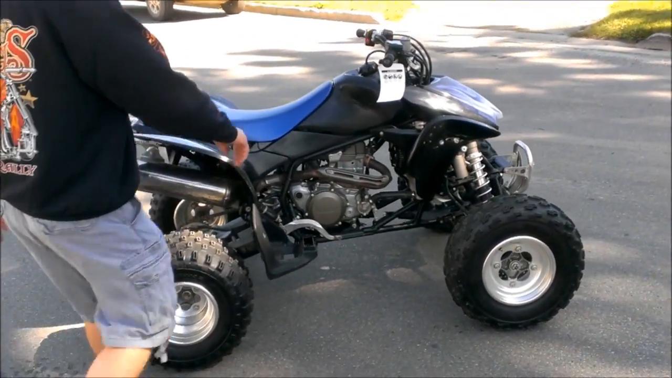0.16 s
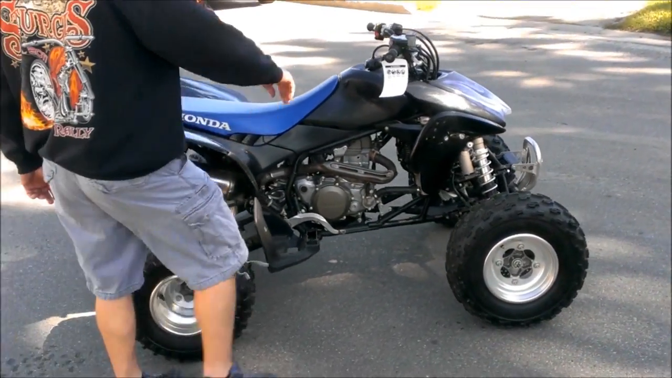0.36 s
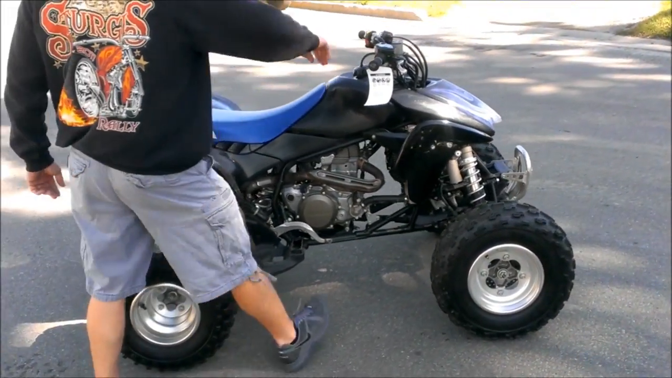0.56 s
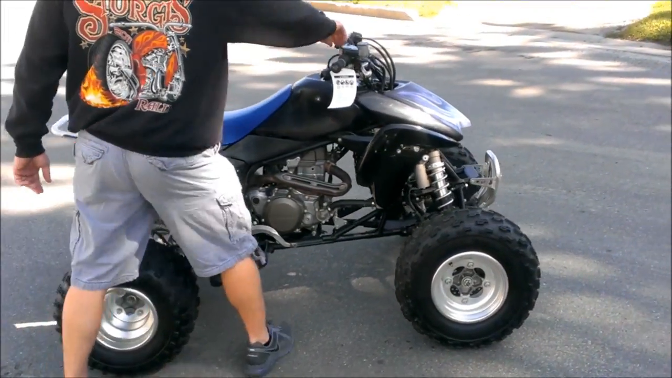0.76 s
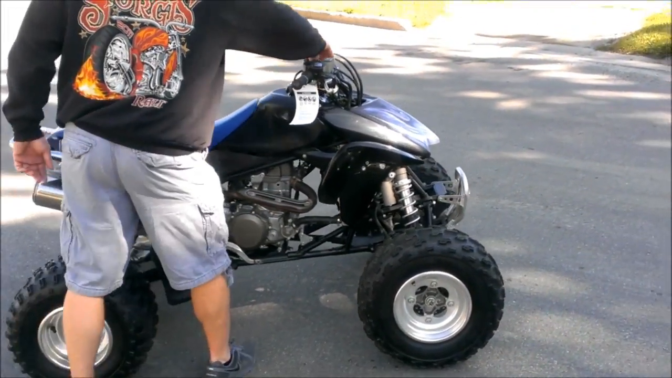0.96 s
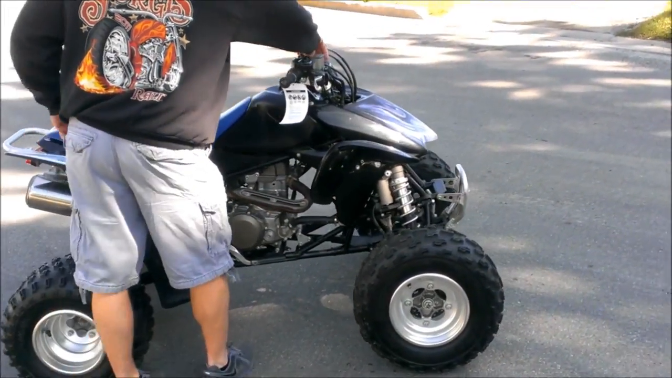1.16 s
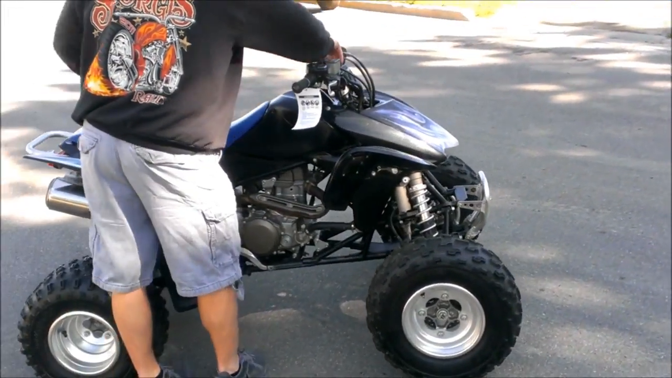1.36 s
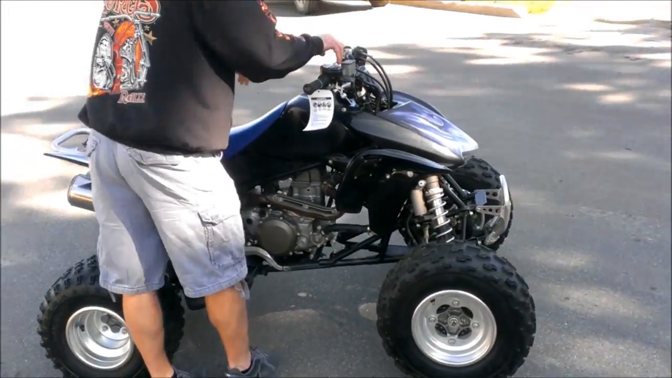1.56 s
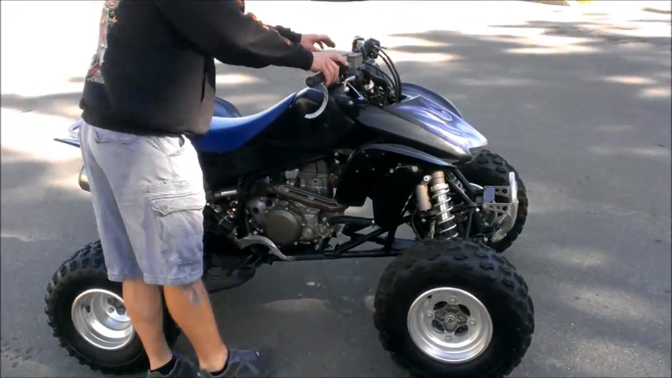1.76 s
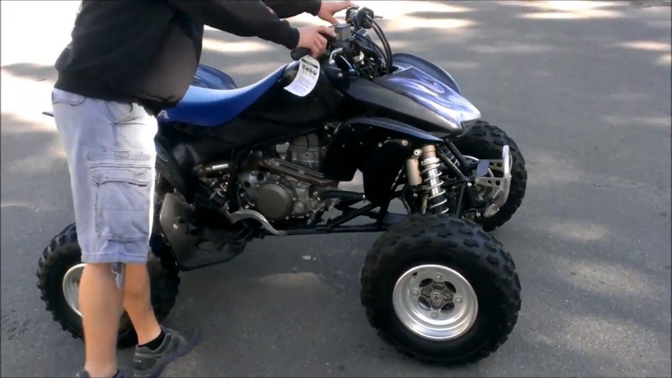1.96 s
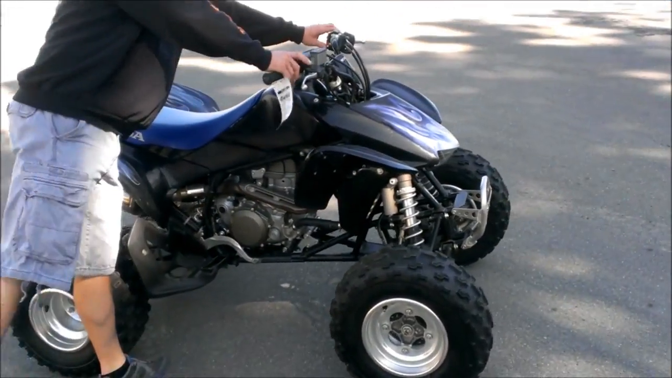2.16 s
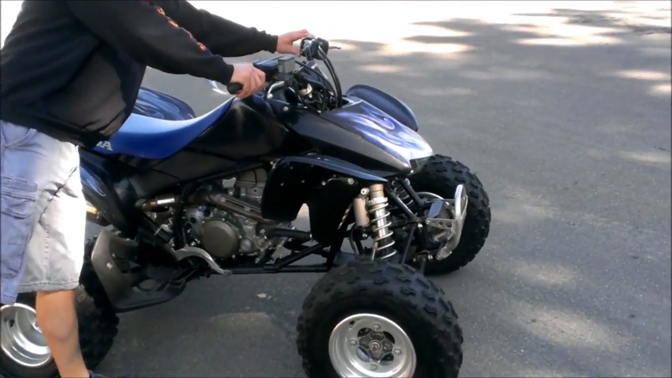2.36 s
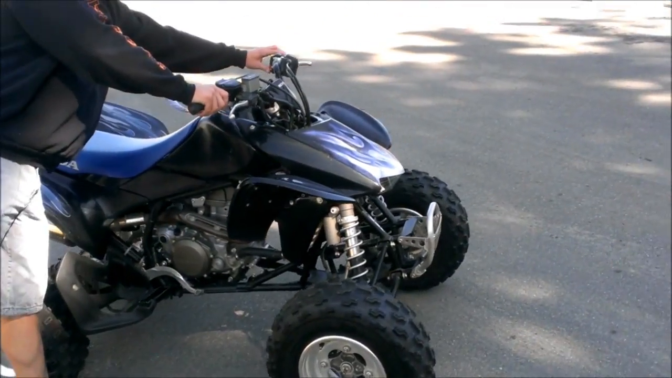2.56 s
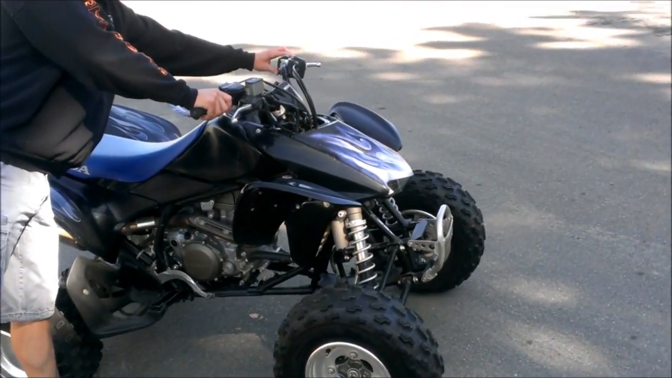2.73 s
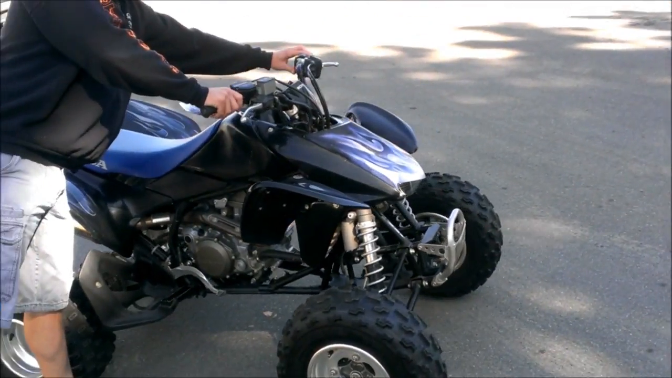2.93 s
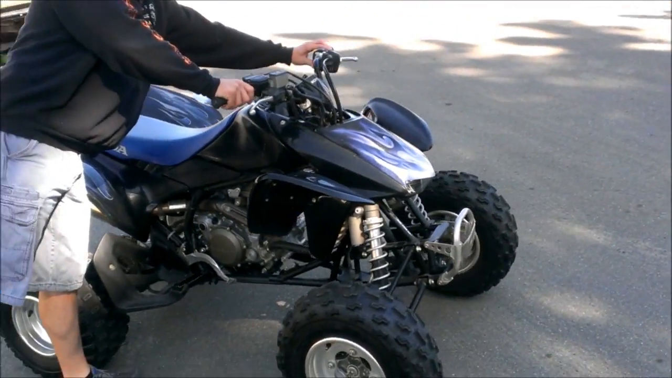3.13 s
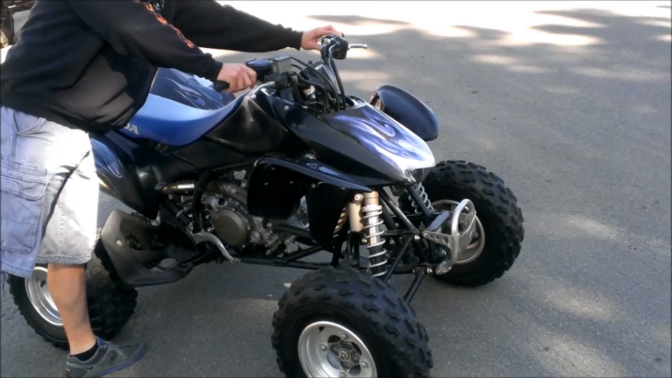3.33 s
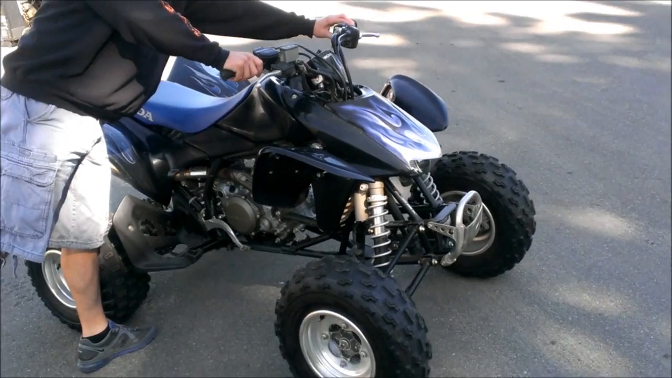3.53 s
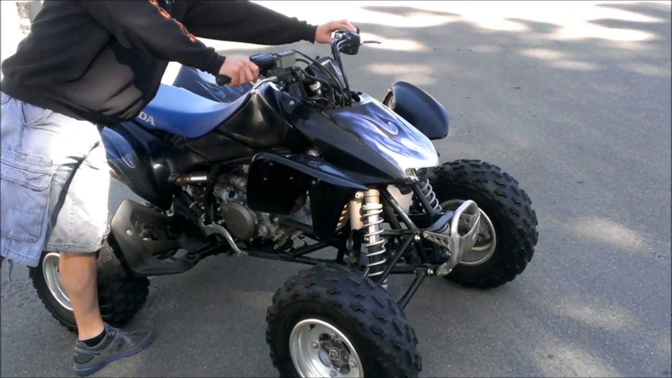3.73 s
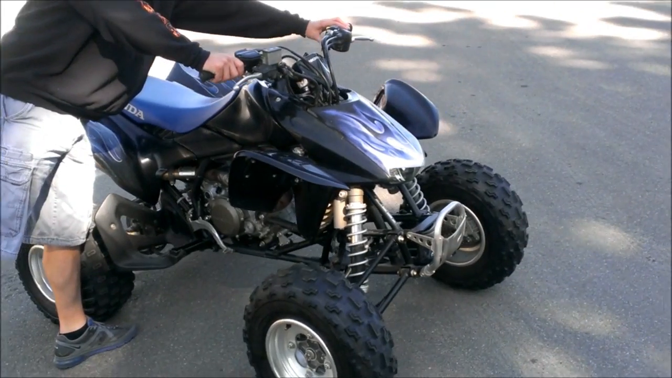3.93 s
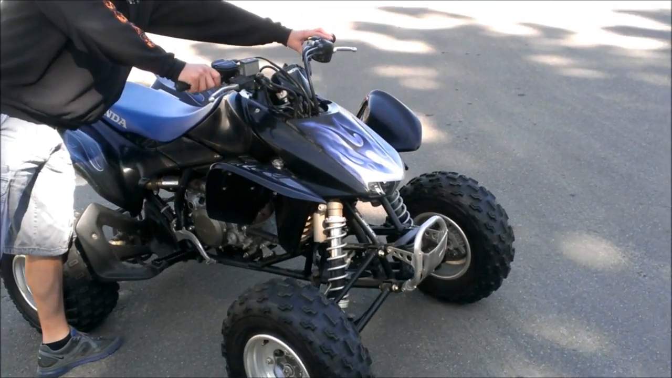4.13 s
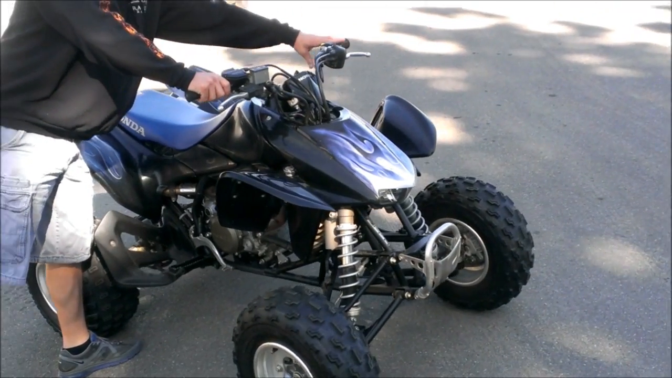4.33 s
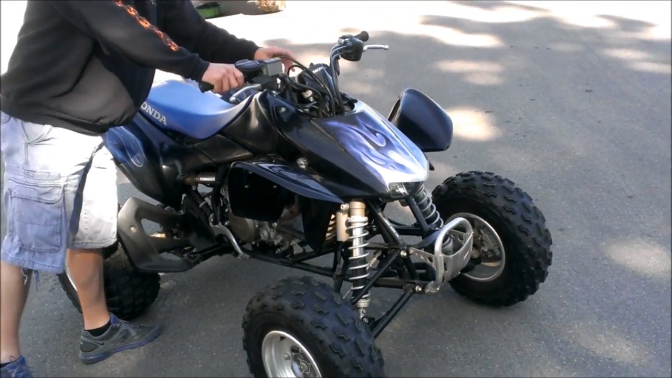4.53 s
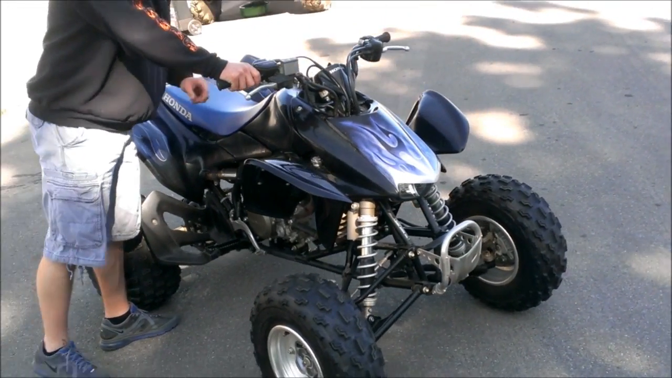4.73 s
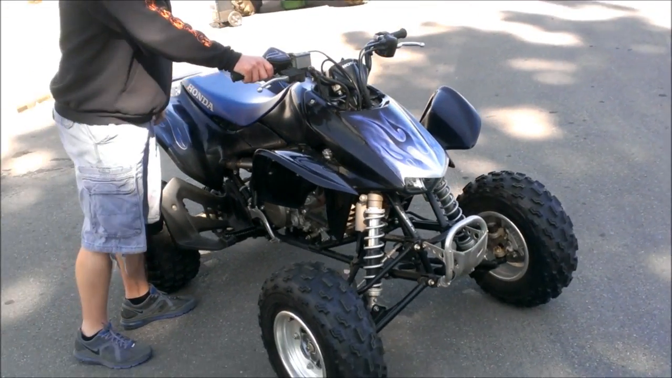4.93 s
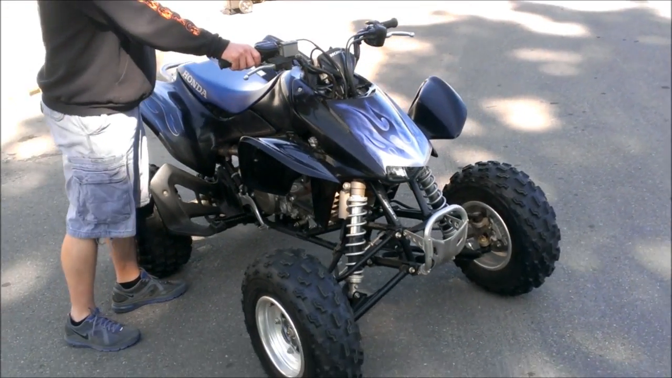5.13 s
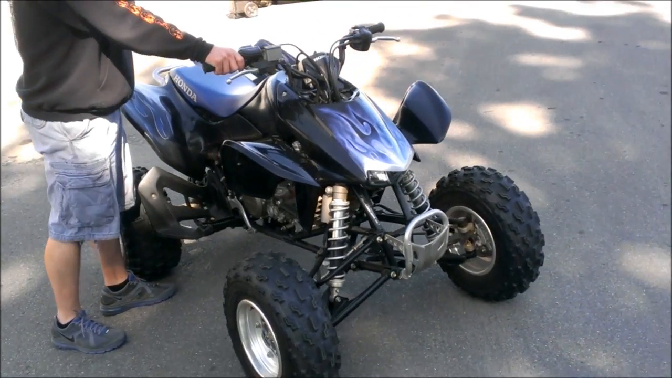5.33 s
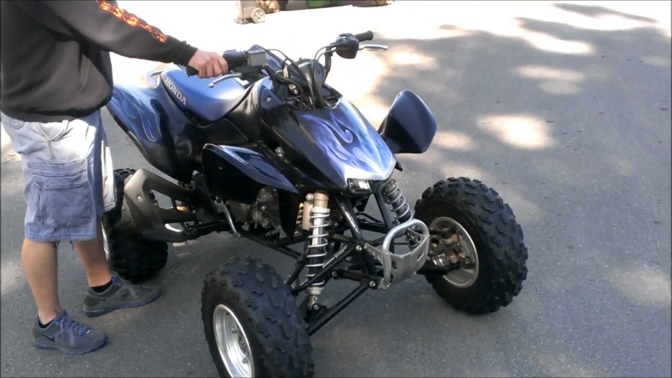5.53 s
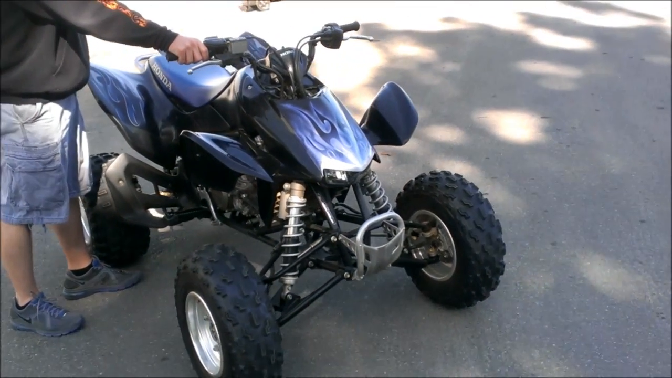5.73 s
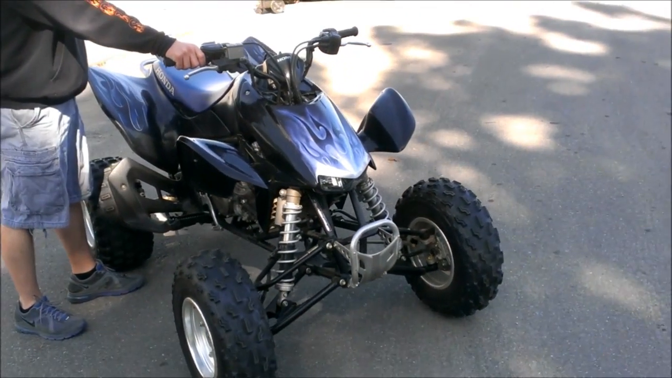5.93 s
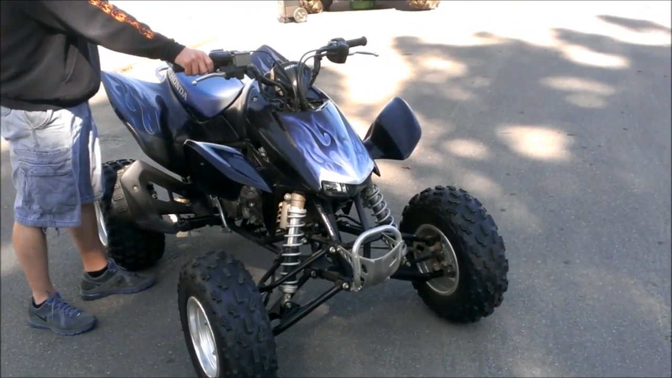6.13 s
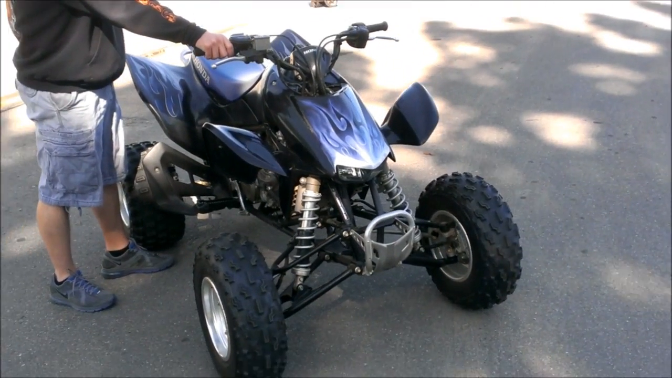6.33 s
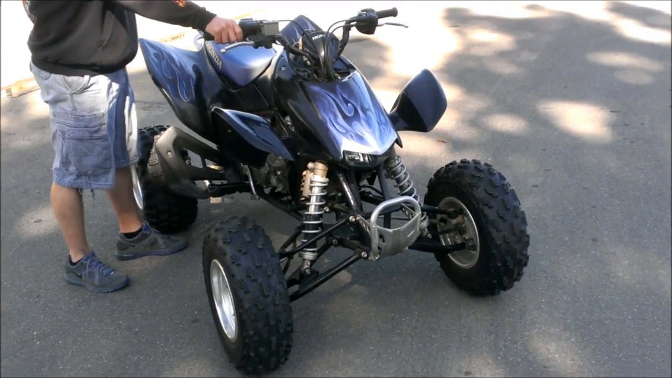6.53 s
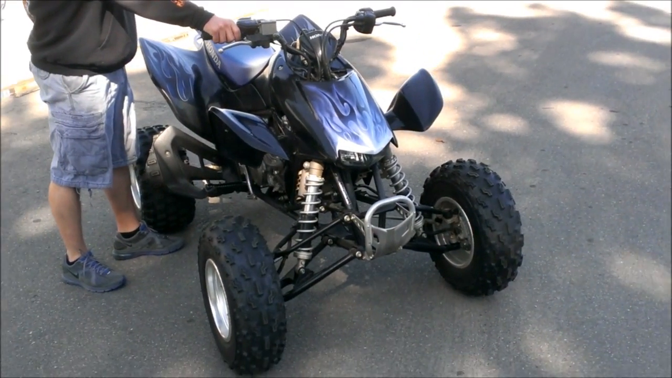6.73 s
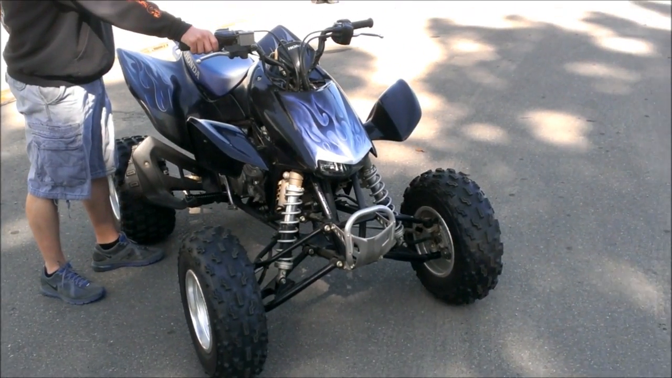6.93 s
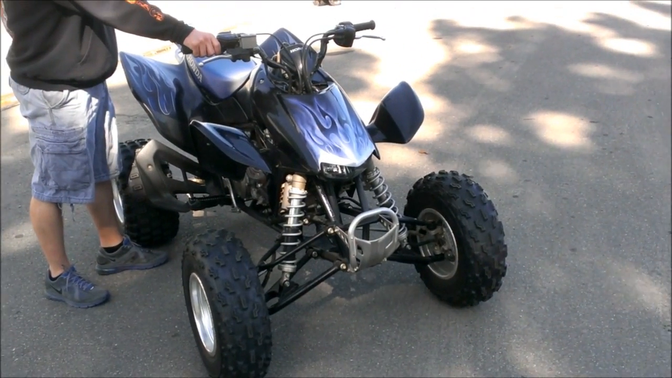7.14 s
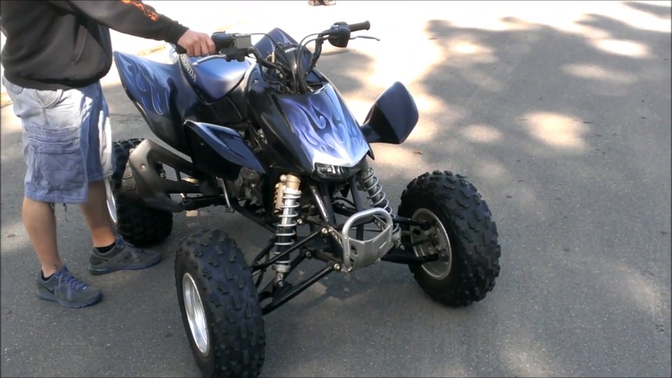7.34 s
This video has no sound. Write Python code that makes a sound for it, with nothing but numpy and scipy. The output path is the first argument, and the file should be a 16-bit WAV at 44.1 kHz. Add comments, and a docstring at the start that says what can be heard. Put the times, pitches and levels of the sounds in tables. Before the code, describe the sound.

After faint clicks and microphone bumps, a quad bike starts up, gets two quick throttle blips and settles into an idle that speeds up.

```python
"""A paved driveway, two metres from a quad bike with a one-cylinder, four-stroke engine.
The key and levers click, and wind or handling bumps the microphone. The electric starter grinds for half
a second and the engine catches. It gets two blips (short twists of the throttle), sags to a slow thumping
idle, climbs to a fast idle and is blipped once more. Pulses of gas make the exhaust pipe boom and bark,
while the piston and valves knock on the metal and set it ringing."""
import sys
import numpy as np
from scipy import signal
from scipy.fft import rfft, irfft, next_fast_len
from scipy.io import wavfile
from scipy.ndimage import uniform_filter1d, minimum_filter1d

SR = 44100
rng = np.random.default_rng(int(sys.argv[2]) if len(sys.argv) > 2 else 0)


def materialize(psi):
    """Save the field psi as 16-bit PCM at rate SR to the path in sys.argv[1].

    A 1-D psi becomes a single channel; in a 2-D psi each row is a channel.
    """
    bounded = np.clip(np.atleast_2d(psi).T, -1, 1)
    quanta = np.round(bounded * 32767).astype(np.int16)
    wavfile.write(sys.argv[1], SR, quanta)


N = 326008
TIME = np.arange(N) / SR
FFT_SIZE = next_fast_len(N, True)
FREQS = np.maximum(np.arange(FFT_SIZE // 2 + 1) * SR / FFT_SIZE, 1)
STARTER_ON_S, STARTER_OFF_S, FIRST_FIRING_S = 3.19, 3.625, 3.634
SPIN_UP_S, SPIN_DOWN_S, THROTTLE_LEAD_S = .0323, .2512, .018
FAST_IDLE_RATE = 24  # firings per second

# Three noise colours: scuffing, low moving air and engine hiss. Each row: frequency in Hz, level in dB.
SCUFF = [(500, -1), (1200, -4), (2500, -8.5), (4200, -12.5), (5500, -20.5), (10000, -23.5)]
RUMBLE = [(25, -26), (60, 3), (90, 3), (170, -4.5), (260, -14.5), (500, -13), (900, -50.5)]
HISS = [(2940, -16.5), (5000, -7.5), (5300, -8.5), (7010, -14.5), (8660, -18), (10100, -22), (10700, -23.5),
        (13900, -55), (22000, -120)]
# The ringing notes of the engine cases and starter gears. Each row: pitch in Hz, width in Hz, level in dB.
CASE_MODES = [(1344, 43, 0.5), (2530, 350, -6.5), (3176, 48, 2.5), (3730, 25, -3), (8460, 36, -11.5),
              (10350, 43, -9)]
# The ringing notes of the pipe and silencer. Each row: pitch in Hz, width in Hz, level in dB.
PIPE_MODES = [(100.7, 24, 1), (138.7, 22, -8), (150.9, 9.4, -7.5), (187.5, 20, -4), (233.5, 31, -10),
              (321, 102, -4), (407.7, 51, -5), (454.6, 12.4, -4.5), (516, 5, -17)]
# Throttle blips. Each row: start in seconds, length in seconds, added firings per second,
# opening from 0 to 1, level of the hard barks in dB, their starting pitch in Hz.
BLIPS = [(4.117, .086, 7.45, .6, -1, 600), (4.464, .127, 18.14, 1, 2, 730), (7.252, .2, 3.6, .9, -13, 780)]
# The cold engine burns unevenly, then steadies, with two stumbles.
# Each row: time in seconds, spread of pulse strength in dB, spread of timing as a share of a cycle.
UNEVEN_BURN = [(3.63, 3, .008), (5.3, 2.5, .008), (5.7, 2.5, .012), (6.0, 1.5, .005), (6.18, 1.2, .003),
               (6.3, 4.5, .028), (6.42, 2, .008), (6.65, 2, .006), (6.8, 4.5, .025), (6.9, 1.2, .004),
               (7.15, 1.2, .005), (7.3, 3, .02)]
# Noise within one engine cycle. Each row: share of the cycle, rushing gas in dB, clatter in dB.
CYCLE_NOISE = [(0, -12, -3), (.04, 0, -3.5), (.2, -3, -7.5), (.45, -8, -8.5), (.68, -15, -8),
               (.76, -15, -1), (.83, -14, -.5), (.92, -15, -3), (1, -12, -3)]
# The pipe sounds while the exhaust valve is open and is damped once it shuts.
# Each row: share of the cycle, boom in dB, bark in dB, rasp in dB.
VALVE_LEVELS = [(0, -2, -3, 0), (.07, 0, -2.5, 1), (.2, 0, 3, 0), (.33, 0, 2, -3), (.5, 0, 0, -6),
                (.63, -8, 1.5, -6), (.76, -6, .5, -8), (.9, -2, -1.5, -8), (1, -2, -3, 0)]
# The low exhaust note rises with speed and throttle. Each row: time in seconds, pitch in Hz, boost in dB.
BOOM_NOTE = [(3.63, 89.5, -16.5), (4.1, 97, -15), (4.17, 120, 6.5), (4.3, 100.5, -5.5), (4.45, 98, -17.5),
             (4.49, 159.6, 21.5), (4.56, 174, 20.5), (4.64, 159, 0.5), (4.72, 115, 0), (4.9, 99.3, -12),
             (5.4, 93.2, -13), (5.95, 123, -10), (6.8, 132, -12.5), (6.93, 180, 12), (7.3, 185, 2)]
# Sharper knocks of the running engine. Each row: time in seconds, level in dB.
KNOCKS = [(3.831, -31), (4.024, -30), (4.336, -29), (4.395, -34), (4.461, -22), (4.828, -24.5),
          (4.934, -36), (5.057, -27), (5.12, -27), (5.255, -31), (5.951, -29), (6.198, -22), (6.437, -49),
          (6.523, -27), (6.689, -21), (7.237, -23), (7.266, -20), (7.301, -32), (7.32, -27), (7.343, -32)]


def from_db(db):
    """Turn decibels into a gain."""
    return 10 ** (np.asarray(db) / 20)


def rms_one(x):
    """Scale a sound to an average power of one."""
    return x / np.sqrt(np.mean(x ** 2) + 1e-20)


def evened(x):
    """Even out slow changes in level; the quick throb stays."""
    power = np.atleast_2d(x ** 2).mean(axis=0)
    power = uniform_filter1d(uniform_filter1d(power, size=4400), size=3000)
    return x / np.sqrt(np.maximum(power, 0) + np.mean(x ** 2) / 20)


def in_time(rows, at=TIME):
    """Draw a curve for each column after the first, read at the given times or shares of a cycle."""
    points, *columns = np.transpose(rows)
    return [np.interp(at, points, column) for column in columns]


def at_hz(points):
    """Draw a curve through the points, across all frequencies."""
    hz, value = np.transpose(points)
    return np.interp(np.log(FREQS), np.log(hz), value)


def cut(x, hz, kind, order=2):
    """Keep the lows, the highs or a band of a sound."""
    return signal.sosfilt(signal.butter(order, hz, kind, fs=SR, output="sos"), x + 1e-18)


def wobble(hz):
    """A random curve that wavers at up to about this rate."""
    return rms_one(cut(rng.standard_normal(N), hz, "low"))


def noise(spectrum, likeness=1):
    """Stereo noise of a given colour: the two sides are alike in the bass and differ in the treble."""
    # Each row: frequency in Hz, likeness of left and right from 0 to 1.
    side_likeness = [(60, .995), (250, .985), (500, .96), (1100, .85), (2000, .25), (3200, .05),
                     (5000, .35), (10000, .35)]
    # Each row: frequency in Hz, left minus right in dB.
    balance = [(250, .3), (1000, -.9), (3000, -.3), (6000, 1.0), (8500, 8.0)]
    mid, side = rfft(rng.standard_normal((2, FFT_SIZE)))
    alike, sides = np.clip(likeness * at_hz(side_likeness), -1, 1), np.array([[1], [-1]])
    both = np.sqrt(1 + alike) * mid + np.sqrt(1 - alike) * side * sides
    edge_fade = np.minimum(1, np.minimum(FREQS / spectrum[0][0], spectrum[-1][0] / FREQS)) ** 4
    colour = from_db(at_hz(spectrum) + sides * at_hz(balance) / 2)
    return rms_one(irfft(both * edge_fade * colour, FFT_SIZE)[:, :N])


def resonate(x, modes):
    """Let a sound ring an object's own notes (modes); narrow ones ring longer."""
    out = 0
    for hz, width, db in modes:
        r = np.exp(-np.pi * width / SR)
        feedback = [1, -2 * r * np.cos(2 * np.pi * hz / SR), r * r]
        feed = np.array([1, 0, -1]) * (1 - r * r) / 2
        out = out + from_db(db) * signal.lfilter(feed, feedback, x + 1e-18)
    return out


def glide(x, hz, width_hz):
    """Let a sound ring one note whose pitch slides."""
    turn, r = np.exp(2j * np.pi * np.cumsum(hz) / SR), np.exp(-np.pi * width_hz / SR)
    return 2 * np.real(turn * signal.lfilter([1 - r], [1, -r], (x + 1e-18) / turn))


def decay(s, t60):
    """Jump up at time s, then fall by 60 dB every t60 seconds."""
    out, span = np.zeros(N), slice(int(s * SR), int((s + 2 * t60) * SR))
    out[span] = from_db(-60 * (TIME[span] - s) / t60)
    return out


def swell(s, held, attack, release):
    """Rise from time s, stay until held seconds have passed, then die away."""
    return np.clip((TIME - s) / attack, 0, 1) * np.exp(-np.clip((TIME - s - held) / release, 0, 20))


def street(level_db=-54):
    """The steady, low hush of a quiet street."""
    # Each row: frequency in Hz, level in dB.
    colour = [(18, -15), (30, -0.5), (69, -6.5), (176, -6), (296, -11), (603, -20.5), (699, -13),
              (894, -16.5), (1610, -26), (2510, -25.5), (5380, -37.5), (9960, -38.5), (10700, -44.5),
              (13900, -67.5), (22000, -120)]
    return from_db(level_db) * noise(colour)


def control_clicks(ring_db=-7, tail_db=-27, tail_t60=0.14):
    """The key, switches and levers snap and ring, each with a faint outdoor tail."""
    # The colour of a snap. Each row: frequency in Hz, level in dB.
    colour = [(88, -34), (150, -5), (252, 6), (373, -1.5), (928, -1), (1420, -8), (2310, -12.5),
              (3870, -5.5), (4710, -4.5), (5740, -22), (7500, -23), (9980, -24), (10700, -24), (13900, -60),
              (22000, -120)]
    # The ringing metal. Each row: pitch in Hz, width in Hz, level in dB.
    lever_modes = [(1300, 140, -8), (2570, 75, 1), (3540, 120, -1), (4170, 17, 6)]
    # Each row: time in seconds, level in dB, added bass in dB, added treble in dB, fade in seconds.
    click_times = [(.151, -24.5, -16, -37, 0.055), (0.165, -37, -8, -1, 0.18),
                   (0.865, -49.5, -14, 11, 0.038), (1.332, -22, -11, 1, 0.048), (1.754, -44, 2, -7, 0.015),
                   (1.785, -57.5, 29, -27, 0.077), (2.365, -51.5, 15.5, -14, 0.068),
                   (2.414, -18.5, 2.5, -12.5, 0.017), (2.907, -51, 26, -8, 0.021)]
    snap, echo = noise(colour), noise(SCUFF)
    snap = rms_one(snap + from_db(ring_db) * rms_one(resonate(snap, lever_modes)))
    bass, middle, treble, tail = np.zeros((4, N))
    for s, db, bass_db, treble_db, t60 in click_times:
        blow = from_db(db) * decay(s, t60)
        bass += from_db(bass_db) * blow
        middle += blow
        treble += from_db(treble_db) * blow
        tail += from_db(db + tail_db) * decay(s, tail_t60)
    return (cut(snap * bass, 980, "low") + cut(snap * middle, [700, 4500], "band")
            + cut(snap * treble, 3030, "high") + echo * tail)


def mic_bumps(t60=0.1):
    """Soft, low thumps of wind or handling on the microphone, mostly on the left."""
    # Each row: time in seconds, level in dB, pitch in Hz, left minus right in dB.
    bumps = [(0.151, -36, 105, 1), (0.323, -39, 89, 0), (1.098, -40, 110, 20), (1.265, -44, 102, 24),
             (2.692, -29, 82.5, 17), (2.857, -20, 89, 13)]
    sides = np.array([[.5], [-.5]])
    thuds = sum(from_db(db + pan_db * sides) * decay(s, t60) * np.sin(2 * np.pi * hz * (TIME - s))
                for s, db, hz, pan_db in bumps)
    return cut(thuds, 150, "low")


def mic_rumble(attack_s=0.052, release_s=0.04, still_rumble_db=-59, still_scuff_db=-69):
    """Low wind and handling rumble on the microphone swells and flutters, with faint scuffs."""
    # Each row: start in seconds, length in seconds, low rumble in dB, scuff in dB.
    swells = [(0.73, 0.14, -50.5, -65), (1.062, 0.066, -39, -55), (1.233, 0.18, -56.5, -62.5),
              (1.685, 0.16, -47.5, -62.5), (2.02, 0.39, -46, -61.5), (2.5, 0.43, -46.5, -63)]
    rumble, scuff = from_db(still_rumble_db), from_db(still_scuff_db)
    for s, held, rumble_db, scuff_db in swells:
        shape = swell(s, held, attack_s, release_s)
        rumble = rumble + from_db(rumble_db) * shape
        scuff = scuff + from_db(scuff_db) * shape
    flutter_db = 3 * wobble(14)
    rumble = rumble * from_db(flutter_db) * noise(RUMBLE, likeness=0.67)
    return rumble + scuff * from_db(flutter_db / 2) * noise(SCUFF)


def squeaks(width_hz=500, attack_s=.012, release_s=0.028):
    """Shoe and sleeve rub with a thin, pitched scrape."""
    # Each row: start in seconds, length in seconds, level in dB, pitch in Hz.
    scrapes = [(.79, 0.074, -61.5, 3000), (1.09, 0.032, -62, 4380)]
    out, rub = 0, rng.standard_normal(N)
    for s, held, db, hz in scrapes:
        mode = [(hz, width_hz, 0)]
        scrape = rms_one(resonate(resonate(rub, mode), mode))
        out = out + from_db(db) * swell(s, held, attack_s, release_s) * scrape
    return out


def starter_gears(free_db=-26.5, ring_db=-3, whine_db=-38, sing_db=-4, grip_s=0.0044, slip_s=0.0059):
    """The gears whine and ring the cases: dull when running free, grinding brightly under load."""
    # The colour of the grinding. Each row: frequency in Hz, level in dB.
    colour = [(150, -34.5), (250, -16), (401, -8.5), (866, -22.5), (1150, -10.5), (1340, -4.5),
              (1960, -12.5), (2090, -16.5), (3100, 1.5), (3570, -9.5), (4240, -6), (5710, -11.5),
              (7950, -14), (9750, -3.5), (10700, -39), (13900, -61), (22000, -120)]
    # Surges of load. Each row: start in seconds, length in seconds, grinding in dB, whine in dB.
    surges = [(3.193, 0.042, -34.5, -63), (3.233, 0.054, -28.5, -57), (3.324, 0.0055, -21.5, -22.5),
              (3.344, 0.087, -31.5, -62), (3.468, 0.056, -26, -35), (3.576, 0.026, -24, -26.5)]
    # The whine sinks each time the piston squeezes air. Each row: time in seconds, pitch in Hz.
    whine_pitch = [(3.2, 1153), (3.28, 1280), (3.325, 1400), (3.35, 1310), (3.42, 1400), (3.465, 1500),
                   (3.525, 1295), (3.572, 1530), (3.62, 1234)]
    # The tones in the whine. Each row: multiple of the pitch, level in dB.
    overtones = [(1, 0), (2, -4), (3, -5), (6, -14), (7, -13)]
    running = (TIME >= STARTER_ON_S) * (TIME < STARTER_OFF_S) + decay(STARTER_OFF_S, 0.023)
    grind_level, whine_level = 0, running * from_db(whine_db)
    for s, held, grind_db, tone_db in surges:
        load = swell(s, held, grip_s, slip_s)
        grind_level = grind_level + from_db(grind_db) * load
        whine_level += (from_db(tone_db) + from_db(grind_db + sing_db)) * load
    teeth = from_db(wobble(500))
    grit = noise([(1000, 0.0057), (10500, 0.0025)])
    gears = noise(colour) + from_db(ring_db) * rms_one(resonate(grit, CASE_MODES))
    grinding = running * from_db(free_db) * cut(gears, 5500, "low") + gears * grind_level
    whine_hz, = in_time(whine_pitch)
    angle = 2 * np.pi * np.cumsum(whine_hz + 28 * wobble(86.8)) / SR
    whine = sum(from_db(db) * np.sin(k * angle) for k, db in overtones)
    return teeth * (grinding + whine * whine_level)


def air_puffs(pump_hz=70.6, pipe_db=-16, chug_s=3.345, chug_db=-18):
    """Turned by the starter, the piston pumps unburnt air; one puff chugs through the silencer."""
    # Each row: start in seconds, length in seconds, level in dB.
    puff_times = [(3.225, 0.14, -31), (3.335, 0.13, -28), (3.564, 0.16, -22.5)]
    air = noise(RUMBLE)
    hollow = rms_one(resonate(air, PIPE_MODES[-3:]))
    pump = np.sin(2 * np.pi * pump_hz * TIME) + 0.64 * air + from_db(pipe_db) * hollow
    pump *= sum(from_db(db) * swell(s, held, 0.0083, 0.0083) for s, held, db in puff_times)
    return pump + from_db(chug_db) * decay(chug_s, 0.024) * hollow


def starter_run_down(turns, ring_db=-34, ring_hz=3170, whistle_width_hz=70):
    """The released starter drive rings with each knock of the engine and whistles down to rest."""
    # The whistle. Each row: time in seconds, pitch in Hz, level in dB.
    whistle_path = [(3.93, 5570, -98), (3.97, 5350, -61), (4.0, 5450, -47), (4.03, 5140, -47),
                    (4.09, 4900, -47), (4.14, 4880, -90)]
    _, knock_db = in_time(CYCLE_NOISE, turns % 1)
    shaken = noise(HISS) * from_db(1.1 * knock_db)
    ring = rms_one(resonate(shaken, [(ring_hz, 60, 0)])) * swell(STARTER_OFF_S, 0.34, 1 / SR, 0.063)
    hz, db = in_time(whistle_path)
    whistle = rms_one(glide(glide(shaken, hz, whistle_width_hz), hz, whistle_width_hz))
    return from_db(ring_db) * ring + from_db(db) * whistle


def engine_speed():
    """Firings per second: each blip spins the flywheel up, and it coasts back to idle."""
    # The cold engine's wandering idle. Each row: time in seconds, firings per second.
    idle_speed = [(3.634, 8.927), (3.776, 16.902), (3.921, 14.592), (4.13, 17.543), (4.239, 13.198),
                  (5.2, 12.505), (5.641, 17.726), (5.955, 25.165), (6.589, 23.876), (6.642, 24.667),
                  (7.059, 22.85), (7.39, 25.826)]
    idle, = in_time(idle_speed)
    return idle + sum(added * swell(s, held, SPIN_UP_S, SPIN_DOWN_S) for s, held, added, *_ in BLIPS)


def engine_cycles(rate):
    """Count cycles ("turns") since the first firing; each comes a little early or late."""
    turns = np.cumsum(rate * (TIME >= FIRST_FIRING_S)) / SR
    _, spread = in_time(UNEVEN_BURN)
    cycles = np.arange(int(turns[-1]) + 2)
    return turns + spread * np.interp(turns, cycles, rng.standard_normal(len(cycles)) * (cycles > 0))


def since_firing(turns):
    """Seconds since the latest firing."""
    fired = np.diff(np.ceil(turns), prepend=0) > 0
    return TIME - np.maximum.accumulate(TIME * fired)


def engine_levels(rate, linger_s=0.22, catch_db=-11, catch_s=0.15):
    """Boom, bark, rasp, clatter and hiss in dB, as they follow speed and throttle."""
    # Each row: base level in dB, dB added per doubling of speed, dB added at full throttle.
    laws = [(-7.5, 0.84, -1.1), (-16.5, 3.74, -2.1), (-21.5, 0.65, 14.5), (-33, 4.5, 2.8), (-53.5, 8.2, 4.6)]
    throttle = sum(opening * swell(s - THROTTLE_LEAD_S, held + opening * linger_s, 0.0031, 0.11)
                   for s, held, _, opening, *_ in BLIPS)
    doublings = np.log2(np.maximum(rate, 14) / FAST_IDLE_RATE)
    boom, bark, rasp, clatter, hiss = (db + speed_db * doublings + throttle_db * throttle
                                       for db, speed_db, throttle_db in laws)
    weak_db = catch_db * np.clip(1 - (TIME - FIRST_FIRING_S) / catch_s, 0, 1)  # it catches weakly
    burble = swell(4.63, .2, SPIN_UP_S, SPIN_UP_S)  # the throttle shuts after the big blip
    return (boom + weak_db, bark + weak_db + 3 * burble, rasp + weak_db + 3.9 * burble,
            clatter + weak_db / 2, hiss)


def gas_flow(turns, gas, heat, rush_db=-21):
    """Each cycle sends pulses and rushing gas into the pipe; uneven burning stirs the gas more."""
    # A sharp pulse as the valve opens, then a smaller one of opposite sign;
    # then the piston pushes, the valves overlap and the intake shuts.
    # Each row: share of the cycle, signed strength, treble cutoff in Hz, dB added when hot.
    strokes = [(.008, -1.8, 900, -3), (.15, .5, 420, 3), (.224, 4.5, 70, 0), (.407, 3.2, 78, 2),
               (.62, -.2, 320, 3)]
    flow, cycles = 0, np.arange(int(turns[-1]) + 1)
    uneven_db, _ = in_time(UNEVEN_BURN)
    for share, strength, soft_hz, hot_db in strokes:
        at = np.searchsorted(turns, cycles + share)
        at = at[at < N]
        chance_db = uneven_db[at] * rng.standard_normal(len(cycles))[:len(at)]
        pulses = np.bincount(at, strength * from_db(hot_db * heat[at] + chance_db), N)
        flow = flow + cut(cut(pulses, soft_hz, "low", order=1), soft_hz, "low", order=1)
    rush = rms_one(gas * noise([(60, -24.5), (200, -10.0), (700, -17.5)]))
    return rms_one(flow) + from_db(rush_db + uneven_db) * rush


def bounce(x, round_trip_s=.0075, direct_share=0.888):
    """Pressure runs up and down the pipe: part leaves at once, the rest on later trips."""
    lag = np.exp(-2j * np.pi * FREQS * round_trip_s)
    return irfft(rfft(x, FFT_SIZE) * (direct_share + lag) / (1 + direct_share * lag), FFT_SIZE)[:, :N]


def putts(turns, attack_s=0.011, hold_share=.5, release_share=.07, sag_per_s=2.7, pitch_ratio=1.09):
    """Each firing swings the gas in the pipe a few times, sinking in pitch, until the valve shuts."""
    age = since_firing(turns)
    note_hz, _ = in_time(BOOM_NOTE)
    held = np.clip(age / attack_s, 0, 1) * np.exp(-np.maximum(turns % 1 - hold_share, 0) / release_share)
    swings = pitch_ratio * note_hz * age * (1 - sag_per_s * age / 2)
    return (turns > 0) * held * np.cos(2 * np.pi * swings - np.pi / 3)


def exhaust(flow, turns, heat, boom_db, bark_db, split_hz=260, silencer_hz=740, putt_db=-1.5):
    """The silencer turns the gas pulses into a low boom and a boxy bark."""
    # The boxy note firms up at speed. Each row: time in seconds, pitch in Hz, boost in dB.
    bark_note = [(3.63, 542, 5.5), (4.45, 447, -7.5), (4.56, 553, 8), (4.66, 454, 10.5), (4.9, 408, -17),
                 (5.4, 427, -8), (6.0, 496, 7), (6.3, 476, 3), (6.7, 468, 7.5), (7.3, 446.4, 8.5)]
    # Sound runs faster in hot gas, so the pipe's notes rise with heat.
    pipe = sum(resonate(flow * share, [(hz * pitch, width, db) for hz, width, db in PIPE_MODES])
               for share, pitch in ((1 - heat, .94), (heat, 1.025)))
    pipe = cut(cut(pipe, 89.6, "high", order=3), silencer_hz, "low")
    boom_valve_db, bark_valve_db, _ = in_time(VALVE_LEVELS, turns % 1)
    boom_hz, boom_boost_db = in_time(BOOM_NOTE)
    boom = cut(pipe, split_hz, "low")
    boom += from_db(boom_boost_db) * glide(boom, boom_hz, width_hz=50)
    boom = evened(boom * from_db((1.5 - heat) * boom_valve_db))
    boom += (1 - heat) * from_db(putt_db) * evened(putts(turns))
    bark_hz, bark_boost_db = in_time(bark_note)
    bark = (TIME >= FIRST_FIRING_S) * bounce(cut(pipe, split_hz, "high"))
    bark += from_db(bark_boost_db) * glide(bark, bark_hz, width_hz=35)
    bark *= from_db(bark_valve_db)
    return from_db(boom_db - 2.5) * evened(boom) - from_db(bark_db + 3) * evened(bark)


def case_clatter(knock, level_db, ring_db=-13, knock_t60=0.064):
    """The engine cases rattle with every cycle, and now and then take a sharper knock."""
    # Each row: frequency in Hz, level in dB.
    colour = [(500, -16.5), (850, -3), (915, -6), (993, -4), (1080, -10.5), (1240, -4), (1350, -8),
              (1560, -7), (1820, -20.5), (1990, -21.5), (2190, -13), (2670, -11), (2990, -9.5), (4890, -22),
              (6000, -44), (7800, -60.5), (13200, -120)]
    metal = noise(colour) + from_db(ring_db) * rms_one(resonate(noise(colour), CASE_MODES))
    sharp = sum(from_db(db) * decay(s, knock_t60) for s, db in KNOCKS)
    return from_db(level_db + 4.5) * evened(metal * knock) + metal * sharp


def blows(turns, spread_share=.008, spread_db=3.5):
    """Piston and valves strike several times a cycle, never quite alike."""
    # Each row: share of the cycle, strength in dB.
    contacts = [(.3, -8), (.55, -9), (.75, -3), (.80, 0), (.86, -3), (.99, -4)]
    out, cycles = 0, np.arange(int(turns[-1]) + 1)
    for share, db in contacts:
        late, force = rng.standard_normal((len(cycles), 2)).T
        at = np.searchsorted(turns, cycles + share + spread_share * late)
        out = out + np.bincount(at, from_db(db + spread_db * force), N + 1)[:N]
    return out


def fin_ticks(turns, level_db, knock_boost_db=35, spread_db=2.5):
    """Every tick and knock rings the cooling fins and valve cover with a new mix of their notes."""
    # Each row: pitch in Hz, width in Hz, level in dB.
    fin_modes = [(1760, 16, -16), (2642, 32, 0), (3110, 17, -3), (3490, 34, -7.5), (4130, 16, -7),
                 (5050, 22, -12.5), (6314, 27, -21)]
    ticking = np.array([sum(resonate(blows(turns), [mode]) for mode in fin_modes) for _ in range(2)])
    s, db = np.transpose(KNOCKS)
    knocks = 0
    for mode in fin_modes:
        force = from_db(db + knock_boost_db + spread_db * rng.standard_normal(len(s)))
        knocks = knocks + resonate(np.bincount((s * SR).astype(int), force, N), [mode])
    return from_db(level_db - 7) * evened(ticking) + cut(knocks, 4200, "low")


def barrel_ring(turns, rate, loudest_db=-29):
    """The cylinder barrel rings under the piston and valves, hardest at fast idle."""
    # Each row: pitch in Hz, width in Hz, level in dB.
    barrel_modes = [(1029, 39, 4.5), (1207, 58, 10), (2930, 53, -19.5)]
    ring = cut(resonate(blows(turns), barrel_modes), 3200, "low", order=3)
    return from_db(loudest_db - 1.1 * np.abs(rate - FAST_IDLE_RATE)) * evened(ring)


def throttle_rasp(flow, turns, roughness, level_db, rush_db=-9, throat_db=-10):
    """Rushing gas and a few throaty notes, loudest with the throttle open."""
    # The colour of the rush. Each row: frequency in Hz, level in dB.
    colour = [(520, 18), (700, 3.5), (850, -4.5), (1000, -42.5)]
    # The throaty notes. Each row: pitch in Hz, width in Hz, level in dB.
    throat_modes = [(542, 9.8, 10), (613, 77, 11), (677, 33, -13), (766, 22, -18.5)]
    *_, valve_db = in_time(VALVE_LEVELS, turns % 1)
    throat = cut(resonate(flow, throat_modes), [450, 880], "band") * from_db(valve_db)
    rush = noise(colour) * roughness
    return from_db(level_db) * (from_db(rush_db) * evened(rush) + from_db(throat_db) * evened(throat))


def engine(turns, rate, slow_rate=15):
    """Exhaust, clatter, rasp and hiss, all in step with the engine's cycle."""
    boom_db, bark_db, rasp_db, clatter_db, hiss_db = engine_levels(rate)
    gas_db, knock_db = in_time(CYCLE_NOISE, turns % 1)
    heat = np.clip((rate - slow_rate) / (FAST_IDLE_RATE - slow_rate), 0, 1)  # faster means hotter gas
    running = turns > 0
    gas = running * from_db(gas_db)
    flow = gas_flow(turns, gas, heat)
    # No two cycles knock alike, and each knock is a cluster of small contacts.
    force_db = rng.standard_normal(int(turns[-1]) + 1)[turns.astype(int)]
    knock = running * from_db(knock_db + force_db - 0.3 * wobble(290))
    clatter = case_clatter(knock, clatter_db) + fin_ticks(turns, clatter_db) + barrel_ring(turns, rate)
    rasp = throttle_rasp(flow, turns, gas + 0.2 * knock, rasp_db)
    hiss = from_db(hiss_db + 5) * evened(noise(HISS) * (knock + 0.17 * running))
    return exhaust(flow, turns, heat, boom_db, bark_db) + clatter + rasp + hiss


def hard_barks(turns, rest_hz=500, sag_s=0.00517, ring_s=0.0054, die_s=0.005):
    """During a blip, each firing of the overfilled cylinder gives a hard bark that drops in pitch."""
    age = since_firing(turns)
    ring = np.clip(age * SR / 40, 0, 1) * np.exp(-np.maximum(age - ring_s, 0) / die_s)
    out, roughness = 0, .45 * wobble(130)
    for s, held, _, _, db, hz in BLIPS:
        swings = rest_hz * age + (hz - rest_hz) * sag_s * (1 - np.exp(-age / sag_s))
        throttle = swell(s - THROTTLE_LEAD_S, held, 1 / SR, 0.0078)
        out = out - from_db(db - .5) * throttle * ring * np.sin(2 * np.pi * swings + roughness)
    return out


def pops(width_hz=110, ring_t60=0.055, crack_db=-8, crack_t60=0.017):
    """Gas spits in the silencer as the throttle snaps open or shut: a crack and a hollow ring."""
    # Each row: time in seconds, level in dB, pitch in Hz.
    spits = [(4.71, -17, 740), (4.737, -24, 805), (4.755, -25, 760), (4.782, -27, 850), (4.809, -22.5, 825),
             (4.867, -25, 850), (7.243, -19.5, 700), (7.305, -16, 760), (7.319, -20, 840),
             (7.345, -22, 670), (7.384, -37, 805)]
    gas = rms_one(cut(rng.standard_normal(N), [500, 1500], "band"))
    ring = sum(from_db(db) * decay(s, ring_t60) * rms_one(resonate(gas, [(hz, width_hz, 0)]))
               for s, db, hz in spits)
    return ring + gas * sum(from_db(db + crack_db) * decay(s, crack_t60) for s, db, _ in spits)


def surroundings(x, echo_db=-17, left_s=.0131, right_s=.0194):
    """The direct sound, and one faint, thin echo on each side."""
    echo = from_db(echo_db) * cut(x, 420, "high", order=1)
    return x + np.array([np.interp(TIME - late, TIME, side, left=0)
                         for late, side in zip((left_s, right_s), echo)])


def scene():
    """The quad and its rider beside a quiet street."""
    rate = engine_speed()
    turns = engine_cycles(rate)
    quad = surroundings(engine(turns, rate) + hard_barks(turns) + pops())
    starter = starter_gears() + air_puffs() + starter_run_down(turns)
    small_sounds = mic_rumble() + squeaks() + control_clicks() + mic_bumps()
    return quad + starter + small_sounds + street()


def record(dry, ceiling=.8, bass_hz=36, top_hz=10500):
    """A fast limiter turns the loudest peaks down; the deep bass and the highest treble are cut."""
    dry = cut(dry, bass_hz, "high")
    needed_gain = np.minimum(1, ceiling / (np.abs(dry).max(axis=0) + 1e-9))
    gain = uniform_filter1d(minimum_filter1d(needed_gain, size=121), size=121)
    return signal.sosfilt(signal.ellip(12, .2, 90, top_hz, fs=SR, output="sos"), dry * gain)


dry = scene()
out = record(dry)
materialize(out)
```